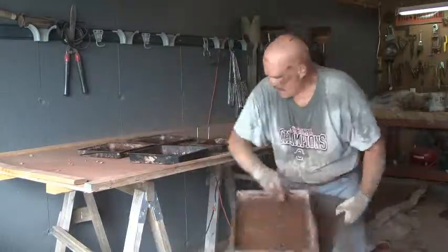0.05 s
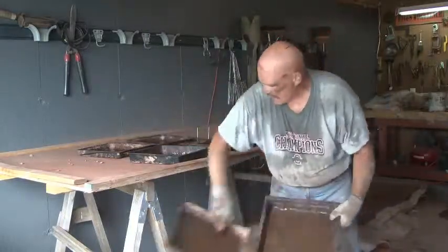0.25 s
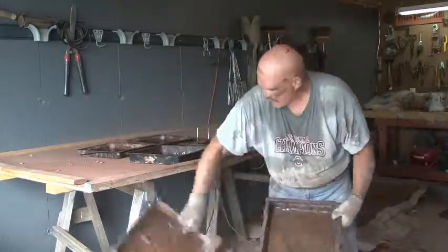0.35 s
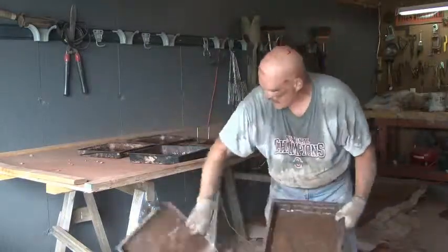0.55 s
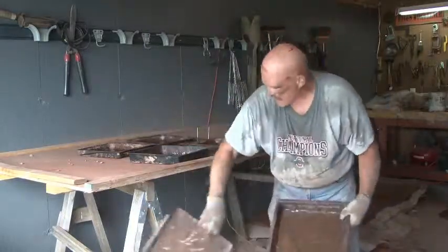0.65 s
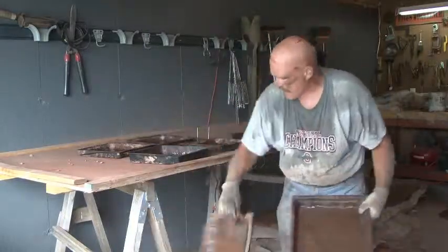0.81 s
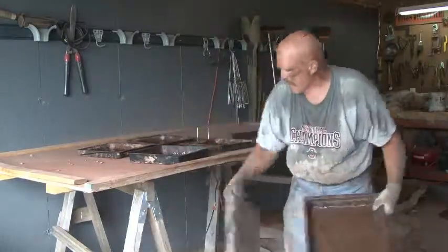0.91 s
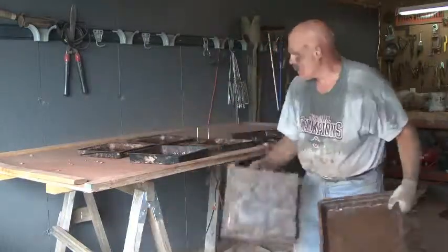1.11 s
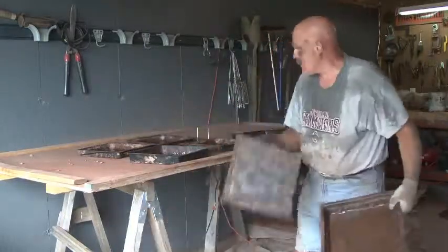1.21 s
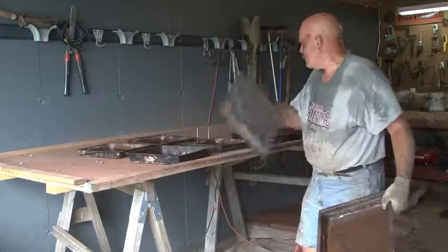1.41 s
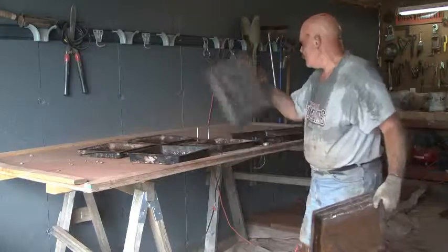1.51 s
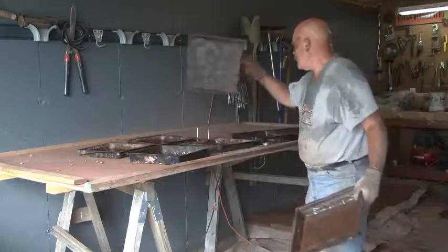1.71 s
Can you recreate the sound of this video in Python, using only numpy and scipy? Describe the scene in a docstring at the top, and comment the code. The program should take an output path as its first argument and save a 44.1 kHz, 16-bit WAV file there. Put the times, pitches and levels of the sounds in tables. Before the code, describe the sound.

Hollow plastic knocks, a loud concrete slab crash, then light scraping and bumps in a workshop.

```python
"""A concrete slab drops out of a knocked plastic paver mould with a crash that overloads the microphone.
Each blow is a crack, a noise clatter and the ringing modes of mould or slab; the floor booms under the
slab. Tipped up and lifted away, it bumps twice on the gritty floor, scrapes, snaps grains and gives a
hollow rubbing tone. A motor hums in the workshop throughout, and there is one thin high chirp."""
import sys
import numpy as np
from scipy import signal
from scipy.fft import rfft, irfft
from scipy.io import wavfile

SR = 44100
rng = np.random.default_rng(int(sys.argv[2]) if len(sys.argv) > 2 else 0)


def put_to_file(sound):
    """Save the sound as 16-bit audio at rate SR, in the file named by the first command-line argument."""
    columns = np.atleast_2d(sound).T  # one column per channel
    safe = np.clip(columns, -1, 1)
    whole_steps = np.round(safe * 32767)
    wavfile.write(sys.argv[1], SR, whole_steps.astype(np.int16))


N = 77175
T = np.arange(N) / SR


def from_db(db):
    """Decibels to gain."""
    return 10 ** (np.asarray(db) / 20)


def unit_rms(x):
    """Scale to rms 1."""
    return x / np.sqrt(np.mean(x ** 2) + 1e-20)


def at_hz(points, hz):
    """Read a table on a log-frequency axis."""
    f, value = np.transpose(points)
    return np.interp(np.log(hz), np.log(f), value)


def drift(corner_hz):
    """Low-passed noise, rms 1."""
    f = np.arange(N + 1) * SR / (2 * N)
    spectrum = rfft(rng.standard_normal(2 * N)) / (1 + (f / corner_hz) ** 2)
    return unit_rms(irfft(spectrum))[:N]


def decay(start_s, t60_s, attack_s):
    """Quick rise, exponential fall."""
    age = np.maximum(T - start_s, 0)
    return (1 - np.exp(-age / attack_s)) * np.exp(-np.log(1000) * age / t60_s)


def leak(pulses, tau_s):
    """Give each pulse an exponential tail."""
    return signal.lfilter([1], [1, -np.exp(-1 / (tau_s * SR))], pulses + 1e-18)


# room's left-right likeness: f/Hz, correlation
ROOM_CORRELATION = [(100, 0.94), (300, 1), (600, 0.99), (1000, 0.99), (2000, 0.77), (4000, 0.7),
                    (8000, 0.15), (15000, 0.04)]

def stereo(pair, hz):
    """Mix two unrelated signals to the room's left-right correlation at hz."""
    alike = np.clip(at_hz(ROOM_CORRELATION, hz), 0, .999)
    mid, side = np.sqrt((1 + alike) / 2) * pair[0], np.sqrt((1 - alike) / 2) * pair[1]
    return np.array([mid + side, mid - side])


def noise_bands(spectrum):
    """Stereo noise, total rms about 1, as (f/Hz, band) pairs."""
    edges = np.geomspace(20, 17000, 25)
    centres = np.sqrt(edges[1:] * edges[:-1])
    white = rng.standard_normal((2, 2, N))
    gains = from_db(at_hz(spectrum, centres))
    gains /= np.sqrt(np.sum(gains ** 2 * np.diff(edges)) * 2 / SR)
    for k, hz in enumerate(centres):
        bandpass = signal.butter(2, edges[k:k + 2], "band", fs=SR, output="sos")
        yield hz, gains[k] * stereo(signal.sosfilt(bandpass, white[k % 2]), hz)


def coloured_noise(spectrum):
    """Stereo noise, all bands summed."""
    return sum(band for hz, band in noise_bands(spectrum))


ATTACK_S = 0.0012

def clatter(blows, spectrum, t60s, gain_db, crack_s=0.0096, crack_db=-1.5):
    """Each blow gives a crack and a dense clatter that dies band by band."""
    out = np.zeros((2, N))
    for hz, band in noise_bands(spectrum):
        energy = np.zeros(N + SR)  # 1 s lead for blows before t = 0
        for t, db, tilt in blows:
            energy[int((t + 1) * SR)] += from_db(db + gain_db + tilt * np.log2(hz / 1000)) ** 2
        tail = leak(energy, at_hz(t60s, hz) / (2 * np.log(1000)))
        crack = from_db(crack_db) ** 2 * leak(energy, crack_s)
        out += band * np.sqrt(tail + crack)[SR:]
    return out


def ring(blows, modes, gain_db):
    """Each blow kicks the body's damped modes at random phase."""
    out = np.zeros((2, N))
    t, db, tilt = np.transpose(blows)
    phases = 2 * np.pi * rng.random((len(blows), len(modes)))
    rise = np.exp(-1 / (ATTACK_S * SR))
    for (hz, mode_db, t60_s), phase in zip(modes, phases.T):
        strength = from_db(db + gain_db + mode_db + tilt * np.log2(hz / 1000))
        kicks = np.zeros(N + SR, complex)
        kicks[((t + 1) * SR).astype(int)] = strength * np.exp(1j * phase)
        pole = np.exp((2j * np.pi * hz - np.log(1000) / t60_s) / SR)
        mode = signal.lfilter([0, 1 - rise], np.poly([pole, pole * rise]), kicks + 1e-18)[SR:]
        out += stereo([mode.real, mode.imag], hz)
    return out


# knocks: t/s, level/dB, tilt/(dB/oct)
MOULD_KNOCKS = [(-.03, -12.5, -0.5), (.209, -8, -1.5), (.2158, -3, -0.3), (.2395, -17.5, 0.5),
                (.301, -32.5, -3), (.592, -16.5, -3.6), (.610, -20.5, -5.5)]
# clatter spectrum: f/Hz, density/dB
MOULD_SPECTRUM = [(40, -49), (110, -17), (220, -8), (450, 2.5), (680, -3), (1000, -11.5), (1400, -10.5),
                  (1900, -19), (2800, -17), (6000, -25.5), (10000, -28), (15000, -39)]
# clatter decay: f/Hz, t60/s
MOULD_DECAY = [(150, 0.37), (500, 0.23), (2000, 0.32), (10000, 0.57)]
# plastic modes: f/Hz, level/dB, t60/s
MOULD_RESONANCES = [(200.5, -15, 0.38), (323, -15, 0.35), (390, -2.5, 0.086), (432.5, 1, .13),
                    (496.7, -5.5, .12), (718, -8.5, 0.16), (966.5, -9, 0.13), (990, -13, 0.2),
                    (1310, -17, 0.28), (2720, -20.5, 0.24)]

def mould_knocks():
    """The plastic mould clatters and rings under dull knocks."""
    noise = clatter(MOULD_KNOCKS, MOULD_SPECTRUM, MOULD_DECAY, gain_db=-10.5)
    return noise + ring(MOULD_KNOCKS, MOULD_RESONANCES, gain_db=-4.5)


# motor tones: f/Hz, level/dB
HUM_TONES = [(118.4, -37), (145.3, -44), (220.7, -54), (441.4, -53), (716, -57)]
# swell: t/s, gain/dB
HUM_ENVELOPE = [(0, -0.5), (.35, 1), (.7, 2.5), (.95, 2.5), (1.15, -0.5), (1.4, -1.5), (1.75, 2)]

def motor_hum(waver_db=0.5, waver_hz=1.38):
    """Motor tones waver in level and pitch, swelling and sinking together."""
    hum = np.zeros(N)
    for hz, db in HUM_TONES:
        amplitude = np.sqrt(2) * from_db(db + waver_db * drift(12))
        phase = 2 * np.pi * np.cumsum(hz + waver_hz * drift(6.4)) / SR
        hum += amplitude * np.sin(phase)
    return hum * from_db(np.interp(T, *np.transpose(HUM_ENVELOPE)))


# room noise: f/Hz, density/dB
AIR_SPECTRUM = [(25, -34), (60, -47), (95, -12), (130, 6.5), (200, -15.5), (300, -15), (420, -6), (620, -7),
                (1000, -13.5), (2000, -15.5), (5000, -29.5), (10000, -30), (15000, -38)]

def workshop_air(level_db=-39):
    """Steady air noise."""
    return from_db(level_db) * coloured_noise(AIR_SPECTRUM)


# drag: t/s, level/dB
SCRAPE_ENVELOPE = [(0, -40.5), (.12, -48.5), (.19, -40), (.35, -43.5), (.55, -34.5), (.66, -42),
                   (.78, -35.5), (.89, -38), (.96, -37.5), (1.11, -37.5), (1.19, -47.5), (1.5, -46.5),
                   (1.58, -41), (1.66, -39), (1.75, -46)]
# rasp: f/Hz, density/dB
SCRAPE_SPECTRUM = [(100, 5), (600, -0.5), (1200, 3), (2500, -2), (5000, -1.5), (10000, -3.5),
                   (15000, -13.5)]

def scrape(grains_per_s=570, grain_s=0.00033, grain_depth=0.56):
    """Concrete dragged over grit: noise roughened by tiny random grains."""
    grains = (rng.random(N) < grains_per_s / SR) * rng.exponential(1, N)
    roughness = unit_rms(1 + grain_depth * leak(grains, grain_s))
    rasp = coloured_noise(SCRAPE_SPECTRUM) * roughness
    return rasp * from_db(np.interp(T, *np.transpose(SCRAPE_ENVELOPE)))


# landing blows: t/s, level/dB, tilt/(dB/oct)
SLAB_BLOWS = [(.3835, -2.5, 1), (.392, -5.5, 3.5), (.399, 1, -2.5), (.410, 0.5, 1.7), (.430, -3.5, -2.3),
              (.454, -6, 1.76), (.559, -21, 4.5)]
# clatter spectrum: f/Hz, density/dB
SLAB_SPECTRUM = [(25, -39), (60, -41), (110, -15), (180, -13.5), (420, 4), (700, -2.5), (1300, -3),
                 (2500, -12), (4000, -17.5), (6000, -24), (10000, -28.5), (15000, -43)]
# clatter decay: f/Hz, t60/s
SLAB_DECAY = [(100, 0.42), (500, 0.24), (2000, 0.37), (10000, 0.34)]
# modes of the slab on the floor: f/Hz, level/dB, t60/s
SLAB_RESONANCES = [(245.8, -12, 0.51), (267.7, -13.5, 0.44), (325.6, -16, 0.34), (384.6, 0, 0.16),
                   (420.4, -3, 0.32), (512, -4, 0.27), (543, -5.5, 0.4), (686, -14.5, 0.33),
                   (742, -10, 0.33), (774.5, -7, 0.33), (1026, -2.5, 0.28), (1112, -3, 0.26),
                   (1258, -5, 0.28), (1427, -6.5, 0.32), (1660, -23, .26), (2245, -9.5, 0.26),
                   (2510, -13, .25), (3185, -14, 0.19), (4075, -10, 0.19)]

def slab_crash():
    """The slab lands, slaps flat and rocks."""
    noise = clatter(SLAB_BLOWS, SLAB_SPECTRUM, SLAB_DECAY, gain_db=-5.5)
    return noise + ring(SLAB_BLOWS, SLAB_RESONANCES, gain_db=-11)


# heavy contacts: t/s, level/dB
FLOOR_THUMPS = [(0.385, -8), (.416, -30), (0.487, -20)]
# boom: f/Hz, density/dB
FLOOR_SPECTRUM = [(25, -37), (55, -33), (80, -13), (110, 6), (150, 2), (260, -13), (1000, -53)]

def floor_thumps(t60_s=0.23, attack_s=0.0062):
    """The floor booms briefly under the slab's weight."""
    envelope = sum(from_db(db) * decay(t, t60_s, attack_s) for t, db in FLOOR_THUMPS)
    return coloured_noise(FLOOR_SPECTRUM) * envelope


# snapping grains: t/s, level/dB, f/Hz
GRIT_TICKS = [(.560, -19.5, 5560), (0.6723, -26, 1860), (0.6906, -28.5, 4300), (.7261, -28, 2200),
              (0.7537, -25.5, 3150), (0.785, -29, 5500), (.795, -30.5, 4700), (0.8164, -29, 2260),
              (.920, -29.5, 3650), (0.937, -34, 4400), (0.97, -30, 2040), (1.095, -31.5, 8500),
              (1.1263, -25.5, 4450), (1.207, -36, 8100), (1.378, -36, 7200), (1.580, -37, 3140),
              (1.652, -35, 4160)]

def grit_ticks(snap_s=0.0022, log_half_width=0.25, room_db=-12, room_t60_s=.25):
    """Grains crack under the slab's edge, each in one broad resonance with a short room wash."""
    out = np.zeros((2, N))
    for t, db, hz in GRIT_TICKS:
        edges_hz = hz * np.exp([-log_half_width, log_half_width])
        bandpass = signal.butter(2, edges_hz, "band", fs=SR, output="sos")
        noise = unit_rms(signal.sosfilt(bandpass, rng.standard_normal((2, N))))
        snap = (T >= t) * np.exp(-np.abs(T - t) / snap_s)
        wash = from_db(room_db) * decay(t, room_t60_s, ATTACK_S)
        out += from_db(db) * stereo(noise, hz) * (snap + wash)
    return out


# light contacts: t/s, level/dB, tilt/(dB/oct)
SLAB_BUMPS = [(.834, -25, 4), (.8435, -22, 3), (.852, -27.5, -4.5), (.866, -29, 5.6), (.882, -32.5, -3.5),
              (1.021, -22.5, 2.4), (1.034, -24, 0.2), (1.049, -26.5, -2.5), (1.578, -33, -0.8)]
# clatter spectrum: f/Hz, density/dB
BUMP_SPECTRUM = [(40, -43), (150, -41), (300, -0.5), (600, 3), (1100, -0.5), (2500, -9), (5000, -18.5),
                 (10000, -26), (15000, -43)]

def slab_bumps():
    """The slab bumps twice as it is tipped up, then once faintly as it is lifted."""
    noise = clatter(SLAB_BUMPS, BUMP_SPECTRUM, SLAB_DECAY, gain_db=-4)
    return noise + ring(SLAB_BUMPS, SLAB_RESONANCES, gain_db=-9.5)


# rubbing tone: t/s, level/dB, f/Hz
RUB_TRACK = [(1.25, -61, 620), (1.42, -44, 619), (1.501, -56, 641), (1.54, -42, 701.4), (1.60, -42, 774),
             (1.68, -57, 770)]

def slab_rub(width_hz=58):
    """A faint hollow band of rubbing noise rises in pitch as the slab is swung up."""
    t, db, hz = np.transpose(RUB_TRACK)
    phase = 2 * np.pi * np.cumsum(np.interp(T, t, hz)) / SR
    rub = drift(width_hz) * np.cos(phase) + drift(width_hz) * np.sin(phase)
    return rub * np.interp(T, t, from_db(db), left=0, right=0)


# whistle: t/s, level/dB
CHIRP_ENVELOPE = [(1.305, -67), (1.322, -40), (1.333, -38), (1.345, -43), (1.375, -43.5), (1.40, -48.5),
                  (1.46, -63)]

def chirp(pitch_hz=5480, rough_hz=340, octave_db=-10):
    """A thin, raspy whistle with its octave, smeared differently at each ear."""
    tone = np.zeros((2, N))
    for hz, partial_db in [(pitch_hz, 0), (2 * pitch_hz, octave_db)]:
        smear = np.array([drift(rough_hz) + 1j * drift(rough_hz) for _ in range(2)])
        partial = (smear * np.exp(2j * np.pi * hz * T)).real
        tone += from_db(partial_db) * stereo(partial, hz)
    t, db = np.transpose(CHIRP_ENVELOPE)
    return tone * np.interp(T, t, from_db(db), left=0, right=0)


def scene():
    """Impacts, friction and the workshop's own sounds."""
    impacts = mould_knocks() + slab_crash() + floor_thumps() + slab_bumps()
    friction = grit_ticks() + scrape() + slab_rub()
    return impacts + friction + chirp() + motor_hum() + workshop_air()


def record(dry, knee=10, mono_below_hz=290, cutoff_hz=15700):
    """The crash saturates the input at full scale; the bass is centred and the top is cut."""
    saturated = dry / (1 + np.abs(dry) ** knee) ** (1 / knee)
    mid = saturated.mean(axis=0)
    highpass = signal.butter(1, mono_below_hz, "high", fs=SR, output="sos")
    side = signal.sosfiltfilt(highpass, saturated - mid)
    lowpass = signal.firwin(255, cutoff_hz, fs=SR)
    return signal.fftconvolve(mid + side, lowpass[None], mode="same", axes=1)


dry = scene()
out = record(dry)
put_to_file(out)
```